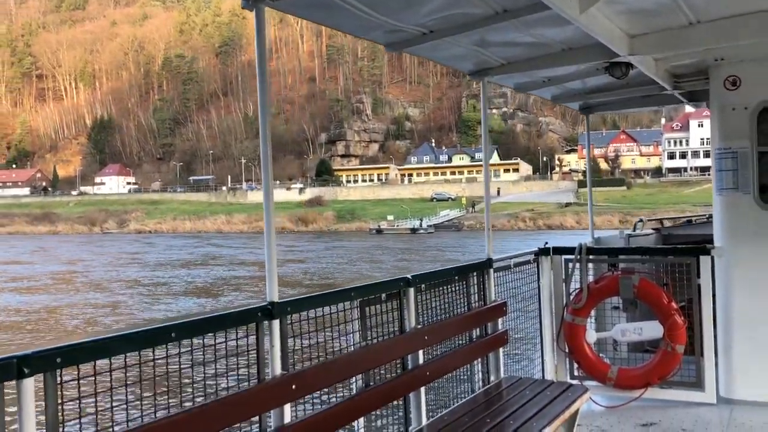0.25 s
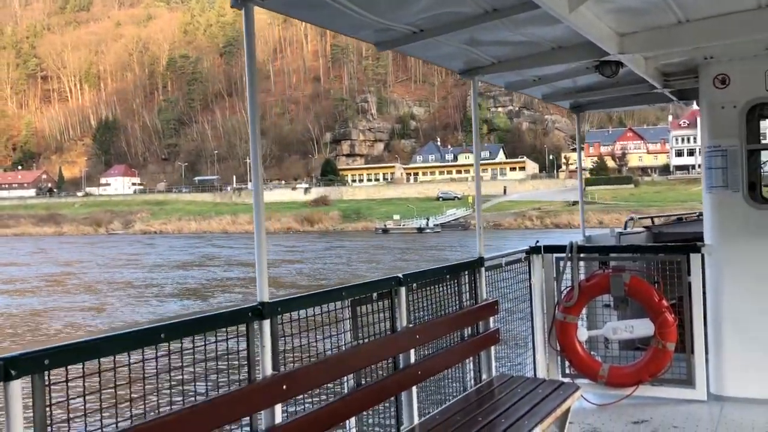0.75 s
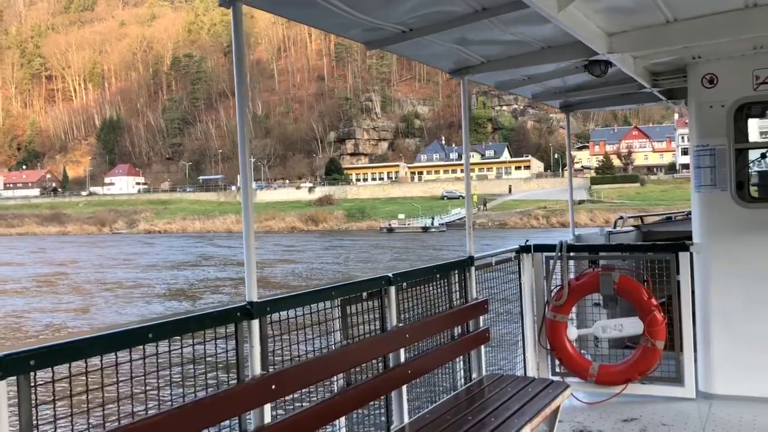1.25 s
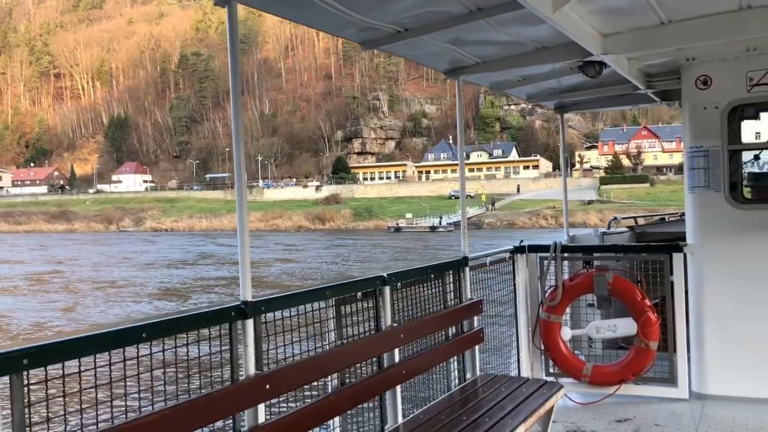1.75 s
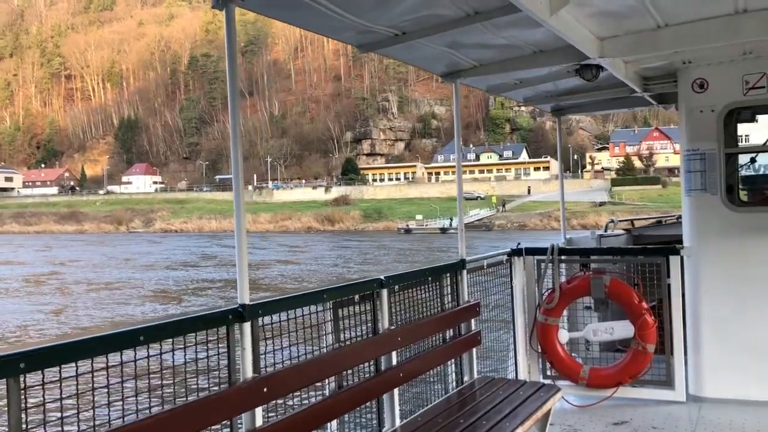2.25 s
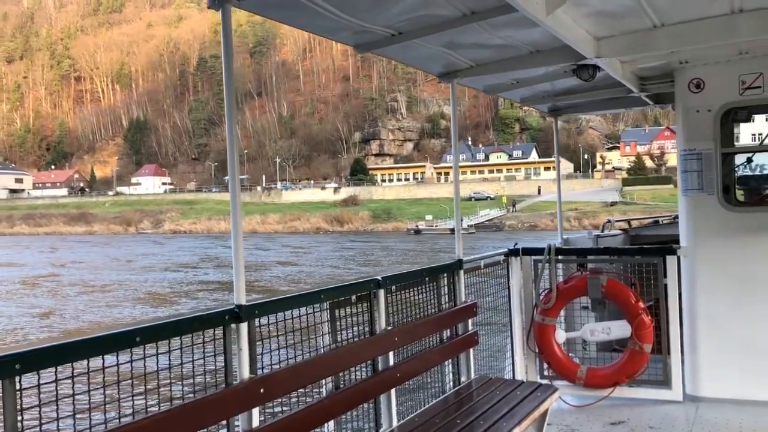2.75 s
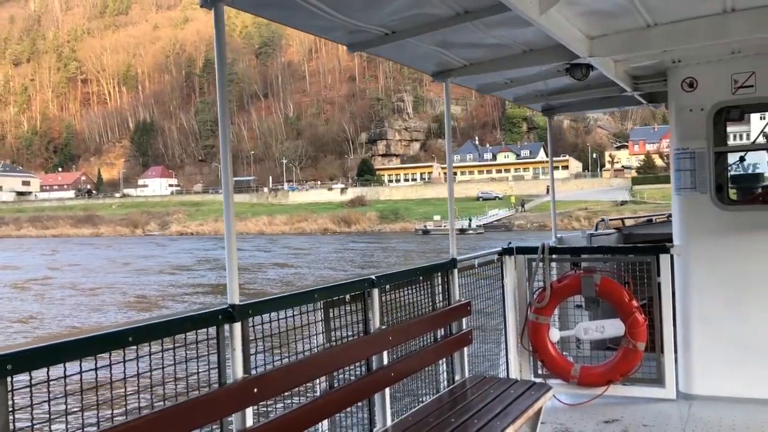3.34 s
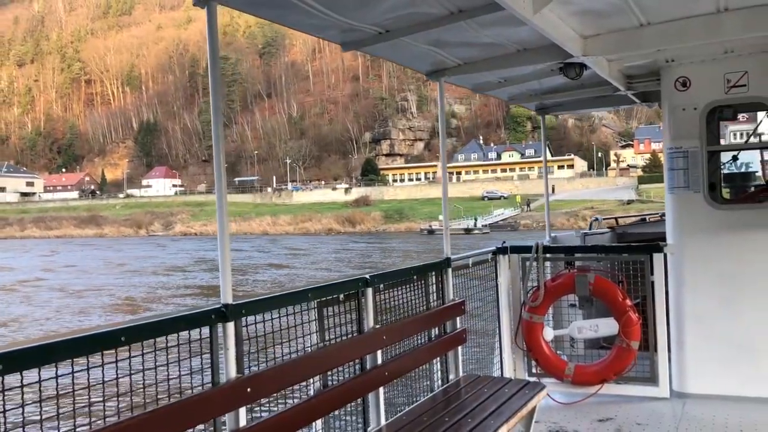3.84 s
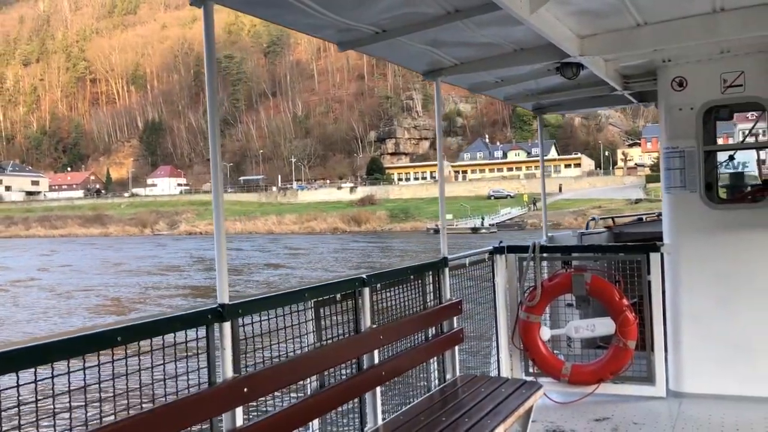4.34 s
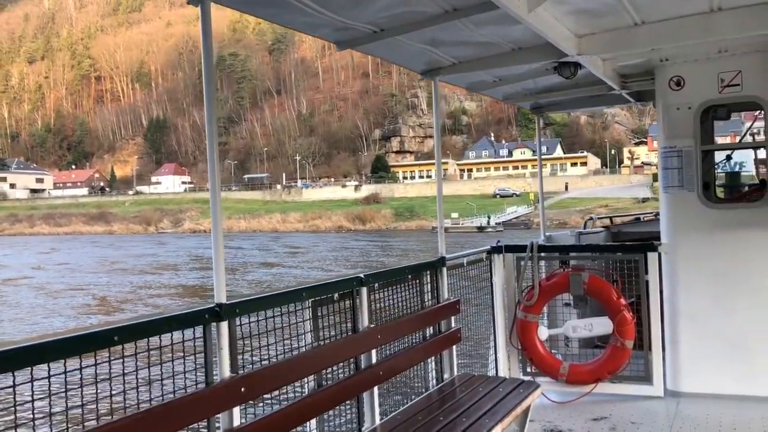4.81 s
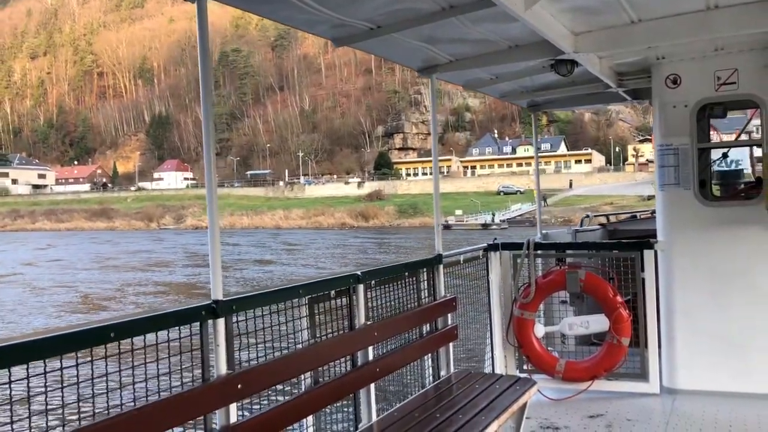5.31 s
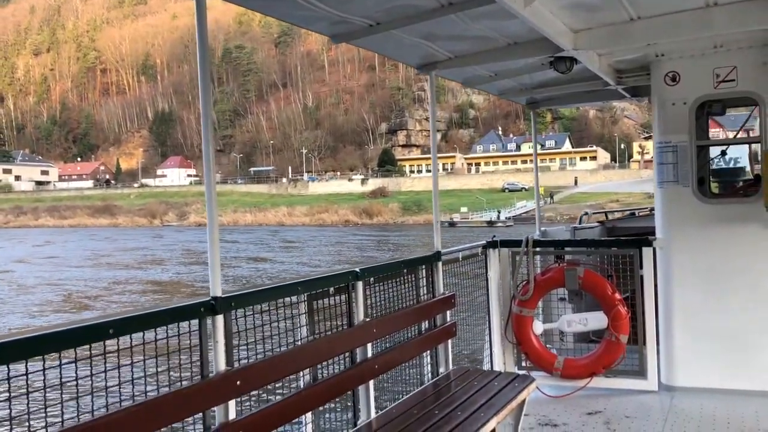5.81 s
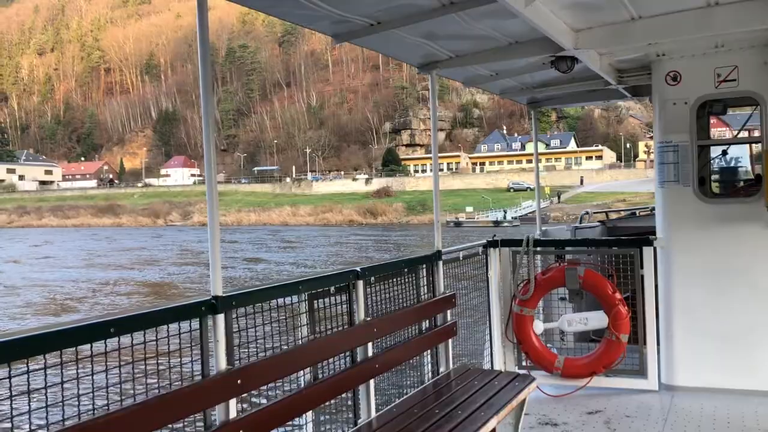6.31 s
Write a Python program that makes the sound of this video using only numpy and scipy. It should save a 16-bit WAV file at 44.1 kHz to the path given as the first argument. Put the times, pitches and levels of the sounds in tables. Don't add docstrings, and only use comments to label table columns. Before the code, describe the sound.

Strong gusts buffet a bare microphone with thumps, flutters and sharp snaps, over the low steady hum and wash of a river ferry.

```python
import sys
import numpy as np
from scipy import signal
from scipy.io import wavfile
from scipy.ndimage import uniform_filter1d, minimum_filter1d

SR = 44100
rng = np.random.default_rng(int(sys.argv[2]) if len(sys.argv) > 2 else 0)


def to_wav(sig):
    pcm = np.clip(np.atleast_2d(sig), -1, 1) * 32767
    pcm = np.round(pcm).astype(np.int16)
    wavfile.write(sys.argv[1], SR, pcm.T)


def how_loud(loudness_db):
    steps = np.asarray(loudness_db, float) / 20
    return 10 ** steps


N = 289737

# (time [s], level [dB])
GUSTS = [(0.0, -25), (0.22, -25), (0.57, -21), (1.3, -34), (1.59, -34), (2.27, -31.5), (2.43, -30),
         (2.63, -29), (3.11, -28.5), (3.51, -25), (3.6, -23), (4.45, -24.5), (4.83, -19), (5.03, -25),
         (5.63, -18.5), (5.86, -21.5), (6.07, -22), (6.57, -12)]
# (time [s], level change [dB], length [ms])
LULLS = [(.11, -5, 26), (.31, -11.5, 24), (.64, -4, 150), (.8, -6.5, 25), (1.09, 1, 29), (1.4, -1, 92),
         (1.69, -2, 98), (2.28, -3.5, 120), (2.59, -1, 46), (3.07, -11, 80), (3.35, -12, 41),
         (3.87, -7, 89), (4.07, -2, 40), (4.37, -4.5, 47), (4.54, -8, 90), (4.81, -11.5, 90), (5.1, 0, 51),
         (5.35, -3, 25), (5.67, -6.5, 160), (5.82, -7.5, 50), (6.02, -6, 92), (6.39, -2, 54)]
# (frequency [Hz], level [dB per Hz])
RUMBLE_TONE = [(30, -22), (55, 4.5), (100, -7.5), (200, -10), (400, -23), (800, -33.5), (1600, -67)]
# (frequency [Hz], level [dB per Hz])
FLUTTER_TONE = [(60, 2.5), (150, 8), (350, -6.5), (600, 3.5), (1000, -42), (2000, -31), (4000, -68)]
# (frequency [Hz], level [dB per Hz])
ROAR_TONE = [(45, -44), (70, -0.5), (120, -11), (250, -17), (400, -25), (650, -21.5), (1000, -24),
             (1900, -29), (2700, -35), (4000, -41.5), (6000, -47), (9000, -51), (12500, -59.5),
             (15600, -61)]
# (frequency [Hz], width [Hz], level [dB rms])
WHINES = [(70, 4, -38), (431, 12, -49), (593, 10, -48), (1367, 10, -50), (1800, 120, -51),
          (2169, 14, -53.5), (2307, 14, -56), (2460, 14, -60), (3220, 22, -65), (4300, 150, -65),
          (5095, 14, -72)]
# (frequency [Hz], width [Hz], peak level [dB])
PUFF_HISSES = [
    (4500, 2000, -58),
    (12100, 800, -64),
]
# (time [s], level [dB rms], centre [Hz], length [ms])
BLOWS = [(.145, -7, 475, 3.4), (.166, -11, 606, 12), (.257, -15.5, 790, 2.3), (.363, -9, 444, 5.6),
         (.529, -11, 584, 3.7), (.579, -14, 240, 6.4), (.705, -7.5, 294, 11), (.733, -11.5, 503, 5.5),
         (0.952, -14, 364, 14), (2.435, -13.5, 523, 6.7), (3.137, -7.5, 553, 4.5), (3.26, -9, 304, 8.4),
         (3.559, -14.5, 370, 6.1), (3.665, -10, 263, 8.5), (3.793, -20.5, 850, 5), (4.159, -10, 390, 7.7),
         (4.853, 0.5, 464, 4.3), (4.883, -14.5, 556, 3.7), (5.139, 1.5, 230, 6.1), (5.138, -7, 610, 8.2),
         (5.161, -10, 492, 16), (5.739, -1.5, 553, 9.3), (5.758, -5, 360, 12.4), (6.064, -10, 497, 2.1),
         (6.199, -4.5, 570, 7.9), (6.36, -12.5, 235, 9.9), (6.416, -3, 556, 7.4), (6.502, 2.5, 516, 8.6),
         (6.524, -7, 420, 7.6), (6.558, -9, 630, 9.2)]
# (time [s], level [dB rms], centre [Hz], length [ms])
SWIRLS = [(.262, -13.5, 286, 9), (.432, -21.5, 523, 18), (.852, -16, 367, 5.8), (.892, -14.5, 425, 5.6),
          (1.031, -15.5, 294, 19), (1.145, -24.5, 300, 15), (1.563, -20.5, 400, 33), (2.06, -21, 276, 30),
          (2.49, -21.5, 266, 40), (2.66, -17, 228, 11), (2.985, -21, 476, 2.7), (3.8, -15, 248, 13),
          (3.487, -19.5, 282, 5.4), (3.619, -18.5, 324, 9.7), (3.7, -22, 510, 22), (3.939, -23, 368, 11),
          (4.185, -16, 400, 17), (4.265, -25, 480, 13), (4.416, -19, 460, 1.3), (4.603, -20.5, 380, 15),
          (4.64, -20.5, 414, 10), (4.705, -15.5, 228, 8.4), (4.999, -14.5, 267, 11), (5.204, -14, 270, 12),
          (5.28, -15.5, 317, 18), (5.47, -13, 543, 6.1), (5.515, -14, 350, 23), (5.567, -15.5, 603, 15.3),
          (6.111, -15.5, 474, 8.5), (6.235, -20, 384, 23)]
# (time [s], level [dB rms], centre [Hz], length [ms])
THUMPS = [(0.16, -6, 138, 14.4), (0.458, -20, 196, 13), (.547, -10.5, 101, 8.3), (0.719, -12.5, 107, 40),
          (1.002, -18.5, 167, 25), (1.559, -14.5, 119, 28), (6.083, -10.5, 84, 26), (2.055, -21.5, 90, 11),
          (2.13, -20, 79, 23), (2.445, -20, 177, 37), (2.85, -22.5, 160, 83), (3.149, -19.5, 139, 15),
          (3.26, -19, 80, 45), (3.41, -14, 170, 5.6), (3.462, -16.5, 176, 14), (3.685, -20, 149, 42),
          (3.994, -17.5, 160, 27), (4.159, -10, 110, 12), (4.6, -19, 101, 26), (4.915, -19, 160, 20),
          (5.154, -6, 117, 18), (6.568, -3, 138, 6.6), (5.408, -12.5, 104, 18), (5.581, -9, 148, 7.8),
          (5.74, -7.5, 185, 12.5), (5.787, -13.5, 172, 14), (5.869, -12.5, 150, 8), (6.186, -16.5, 151, 43),
          (6.444, -9, 59.4, 6.7), (6.532, -10, 109, 20)]
# (time [s], peak level [dB], centre [Hz])
SNAPS = [(.161, -5, 1590), (.2568, -17, 1940), (.362, -20, 1100), (0.527, -22, 1200), (.703, -23, 900),
         (.949, -14, 900), (3.793, -10, 990), (5.565, -29, 1400), (6.11, -24, 1100), (6.415, -25, 1570),
         (1.583, -16.5, 1030), (2.4344, -31, 1480), (3.1344, -19, 1720), (4.156, -19, 1380),
         (5.1343, -13.5, 1500), (5.4527, -13.5, 1190), (5.5116, -12, 920), (5.7281, -11, 1040),
         (5.739, -6, 1240), (5.7572, -9.5, 990), (6.1999, -7, 1090), (6.3617, -16, 1320),
         (6.4283, -5, 1260), (6.4714, -7, 890), (6.496, -14, 1600), (6.523, -2, 1500), (6.5472, -16, 1050),
         (6.558, -6, 1230)]
# (delay [s], loss [dB])
SNAP_CRACKS = [
    (-.001, 2.5),
    (.0025, 5.5),
]
EDDY_SKIRTS = 5, 14.5

RUMBLE_DB, FLUTTER_DB = 0.4, -2.5
FLUTTER_FOLLOWS = 1.08
ROAR_DB = -31
CYCLE_HZ, FIRST_PUFF_S = 5.805, .057
WAKE_GAP_S, WAKE_LOSS_DB = .015, 8.5
STRAY_DB, STRAY_SCATTER_DB = 1.5, 2.5
STRAY_HZ, STRAY_OCTAVES = 380, 0.85
SMALL_CYCLES = 2.02
BLOW_SWELL_DB, BLOW_CORE_DB = -4, 2.5
PORT_CUT_HZ = 48
CEILING_DB, RELEASE_DB_PER_S = -.2, 280


def rms_one(x):
    return x / np.sqrt(np.mean(x ** 2) + 1e-20)


def drift(rate):
    r = np.exp(-80 * np.pi * rate / SR)
    noise = rng.standard_normal(N // 40 + 2002)
    slow = signal.lfilter([1], [1, -2 * r, r * r], noise)[2000:]
    return np.interp(np.arange(N) / 40, np.arange(len(slow)), rms_one(slow))


def band(low_hz, high_hz):
    sos = signal.butter(2, [low_hz, high_hz], "band", fs=SR, output="sos")
    noise = rng.standard_normal(N + 8000)
    return rms_one(signal.sosfilt(sos, noise)[8000:])


def coloured(tone, shared_db, own_db, rate):
    hz, db = np.transpose(tone)
    out, together = 0, drift(rate)
    for centre in hz[0] * 2 ** np.arange(0, np.log2(hz[-1] / hz[0]) + .3, .5):
        level_db = np.interp(np.log(centre), np.log(hz), db) + 10 * np.log10(centre)
        swell = how_loud(shared_db * together + own_db * drift(rate))
        out = out + how_loud(level_db) * swell * band(centre / 2 ** .25, centre * 2 ** .25)
    return rms_one(out)


def wind_db():
    gust_s, gust_db = np.transpose(GUSTS)
    time_s = np.arange(N) / SR
    s, db, ms = np.transpose(LULLS)[:, :, None]
    ticks = np.arange(0, N + 64, 64) / SR
    lull_db = (db * np.exp(-.5 * ((ticks - s) * 2355 / ms) ** 2)).sum(axis=0)
    return np.interp(time_s, gust_s, gust_db) + np.interp(time_s, ticks, lull_db)


def gust_noise(gust_db):
    mean_db = gust_db.mean()
    flutter_db = mean_db + FLUTTER_DB + FLUTTER_FOLLOWS * (gust_db - mean_db)
    rumble = coloured(RUMBLE_TONE, shared_db=1.5, own_db=3.0, rate=25.0)
    flutter = coloured(FLUTTER_TONE, shared_db=3.5, own_db=2.0, rate=70.0)
    return how_loud(gust_db + RUMBLE_DB) * rumble + how_loud(flutter_db) * flutter


def resonant_noise(hz, width_hz):
    r = np.exp(-np.pi * width_hz / SR)
    ringing = [1, -2 * r * np.cos(2 * np.pi * hz / SR), r * r]
    return rms_one(signal.lfilter([1, 0, -1], ringing, rng.standard_normal(N)))


def boat():
    roar = how_loud(ROAR_DB) * coloured(ROAR_TONE, shared_db=-0.2, own_db=1.47, rate=35.0)
    whine = sum(how_loud(db + drift(19.0)) * resonant_noise(hz, width) for hz, width, db in WHINES)
    since_puff_s = ((np.arange(N) / SR - FIRST_PUFF_S) * CYCLE_HZ % 1) / CYCLE_HZ
    puff = 2.2 * (1 - np.exp(-since_puff_s / .006)) * np.exp(-since_puff_s / .02)
    puff = puff * how_loud(.8 * drift(3.0))
    hiss = sum(how_loud(db) * resonant_noise(hz, width) for hz, width, db in PUFF_HISSES)
    return roar + whine + puff * hiss


def wake_eddies():
    s, db, hz, _ = np.repeat(BLOWS, 2, axis=0).T
    turn = np.tile([1, 2], len(BLOWS))
    luck = rng.standard_normal((len(s), 3))
    wake_s = s + WAKE_GAP_S * (turn + .25 * luck[:, 0])
    wake_db = db - WAKE_LOSS_DB * turn - 3 * np.abs(luck[:, 1])
    return [wake_s, wake_db, hz * 2 ** (.3 * luck[:, 2] + .2)]


def stray_eddies(gust_db, count=110):
    at = ((np.arange(count) + rng.random(count)) * N / count).astype(int)
    luck = rng.uniform(-0.97, 1, (count, 2))
    stray_db = gust_db[at] + STRAY_DB + STRAY_SCATTER_DB * luck[:, 0]
    return [at / SR, stray_db, STRAY_HZ * 2 ** (STRAY_OCTAVES * luck[:, 1])]


def small_eddies(gust_db):
    s, db, hz = np.hstack([wake_eddies(), stray_eddies(gust_db)])
    return list(zip(np.minimum(s, N / SR), db, hz, 1000 * SMALL_CYCLES / hz))


def eddies(rows, evenness=1.0, stretch=0.5, trim_db=-4.0):
    s, db, hz, ms = np.transpose(rows)[:, :, None]
    ticks, out = np.arange(0, N + 32, 32) / SR, 0
    for centre in 45 * 2 ** np.arange(0, 6.6, .5):
        octaves = np.log2(centre / hz)
        skirt_db = np.where(octaves < 0, *EDDY_SKIRTS) * np.abs(octaves) ** 1.31
        spread_s = ms / 2355 * (hz / centre) ** stretch
        arrives_s = s - 0.69 * octaves * spread_s
        swell = np.exp(-.5 * ((ticks - arrives_s) / spread_s) ** 2)
        power = (how_loud(db + trim_db - skirt_db) ** 2 * swell).sum(axis=0)
        wave = band(centre / 2 ** 0.23, centre * 2 ** 0.28)
        beats = np.sqrt(uniform_filter1d(wave ** 2, size=int(1.5 * SR / centre)) + 0.046)
        steady = rms_one(wave / beats ** evenness)
        out = out + np.interp(np.arange(N) / SR, ticks, np.sqrt(power)) * steady
    return out


def wavelets(events, cycles, bell):
    out, phases = np.zeros(N), rng.uniform(0, 2 * np.pi, (len(events), 1))
    for (s, db, hz), phase in zip(events, phases):
        at = np.arange(max(int((s - .04) * SR), 0), min(int((s + .04) * SR), N))
        turns = (at / SR - s) * hz
        height = how_loud(db) * np.exp(-.5 * np.abs(turns / cycles) ** bell)
        out[at] += height * np.cos(2 * np.pi * (turns - .09 * turns ** 2) + phase)
    return out


def blows(rows, core_db=-1.0, snap_db=0.5):
    cores = []
    for s, db, hz, ms in rows:
        extra_cycles = max(ms * hz / 1000 - 3, 0)
        cores.append((s, db + core_db - 2.0 * extra_cycles, hz))
    snaps = [(s + late_s, db + snap_db - loss_db, hz)
             for s, db, hz in SNAPS for late_s, loss_db in SNAP_CRACKS]
    return wavelets(cores, cycles=.65, bell=1.8) + wavelets(snaps, cycles=.3, bell=1.25)


def scene():
    gust_db = wind_db()
    others = SWIRLS + THUMPS + small_eddies(gust_db)
    swells = [(s, db + BLOW_SWELL_DB, hz, ms) for s, db, hz, ms in BLOWS] + others
    cores = [(s, db + BLOW_CORE_DB, hz, ms) for s, db, hz, ms in BLOWS] + others
    mix = gust_noise(gust_db) + boat() + eddies(swells) + blows(cores)
    return mix[None]


def top_cut(x):
    return signal.sosfilt(signal.butter(12, 15720, fs=SR, output="sos"), x)


def record(dry):
    x = signal.sosfilt(signal.butter(3, PORT_CUT_HZ, "high", fs=SR, output="sos"), dry)
    over_db = np.maximum(20 * np.log10(np.abs(x) + 1e-9) - CEILING_DB, 0)
    ramp = RELEASE_DB_PER_S * np.arange(N) / SR
    held_db = np.maximum.accumulate(over_db + ramp, axis=1) - ramp
    duck_db = uniform_filter1d(-minimum_filter1d(-held_db, size=89), size=89)
    return top_cut(np.clip(x * how_loud(-duck_db), -.99, .99))


dry = scene()
out = record(dry)
to_wav(out)
```